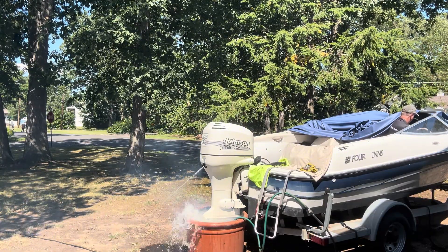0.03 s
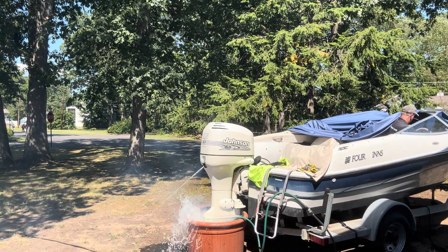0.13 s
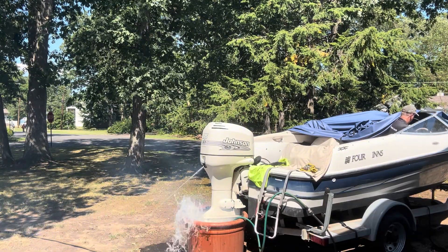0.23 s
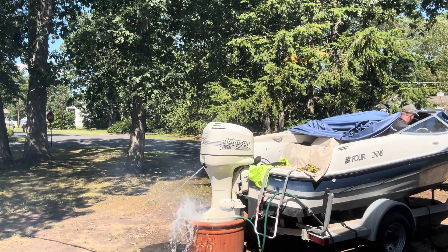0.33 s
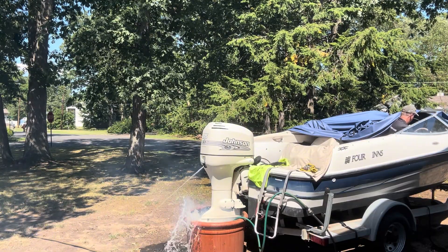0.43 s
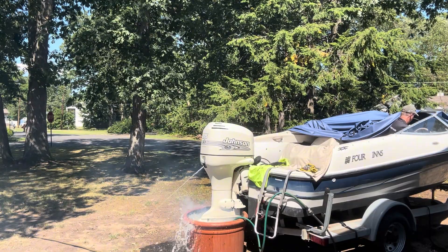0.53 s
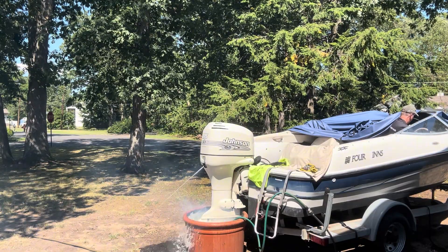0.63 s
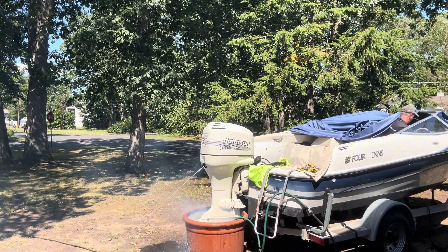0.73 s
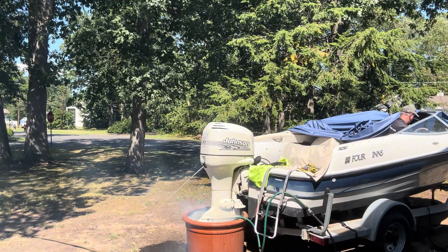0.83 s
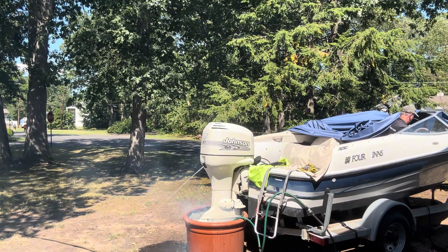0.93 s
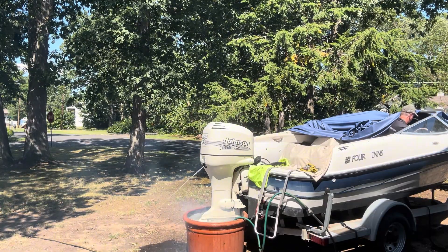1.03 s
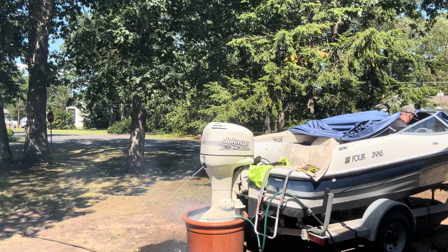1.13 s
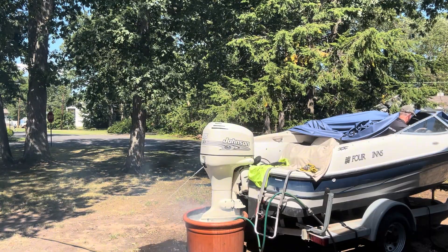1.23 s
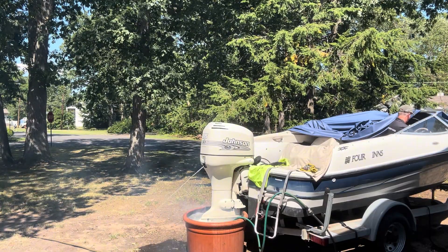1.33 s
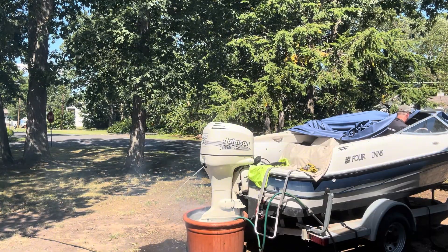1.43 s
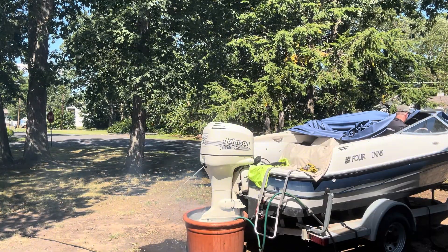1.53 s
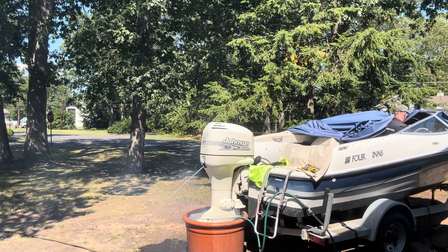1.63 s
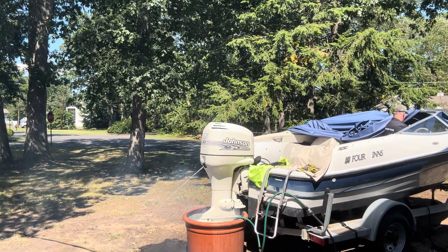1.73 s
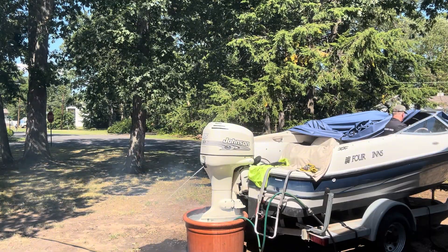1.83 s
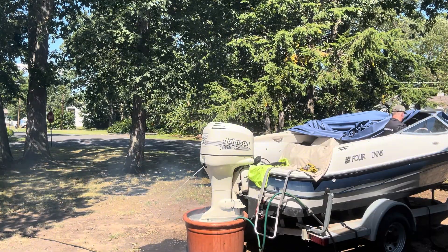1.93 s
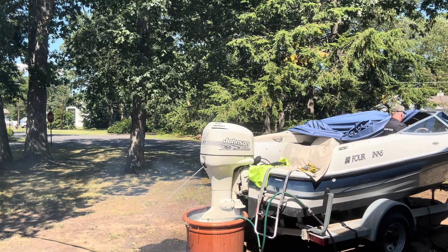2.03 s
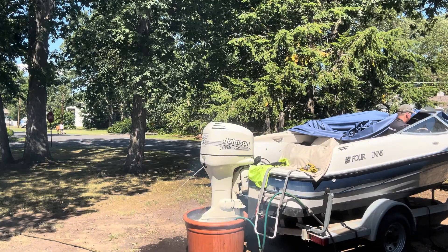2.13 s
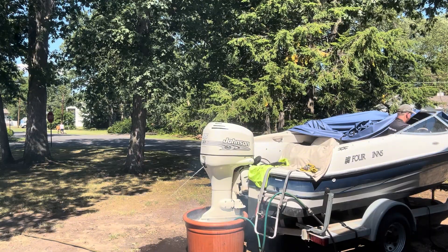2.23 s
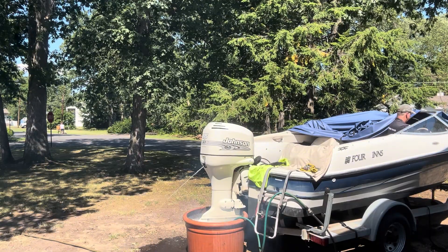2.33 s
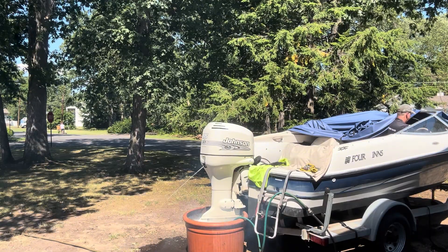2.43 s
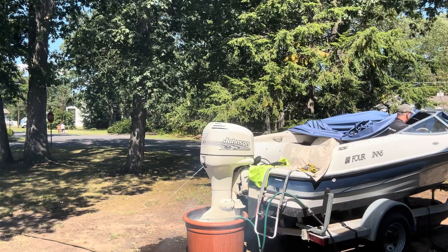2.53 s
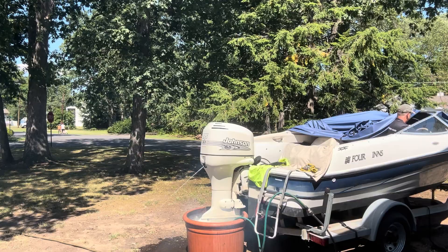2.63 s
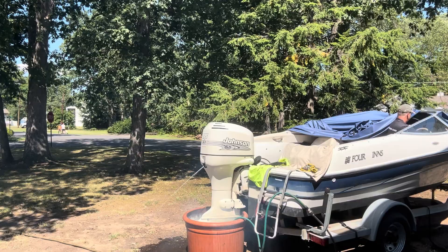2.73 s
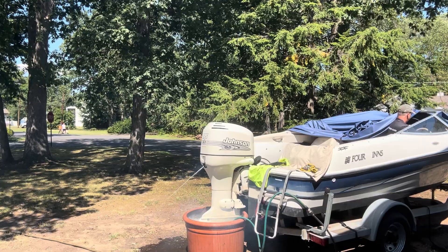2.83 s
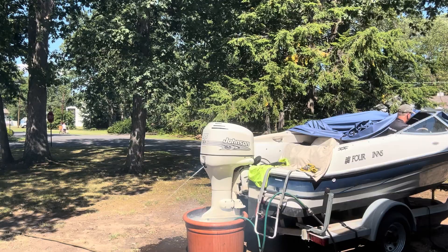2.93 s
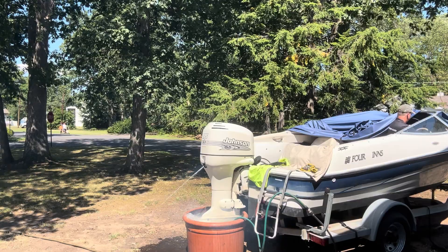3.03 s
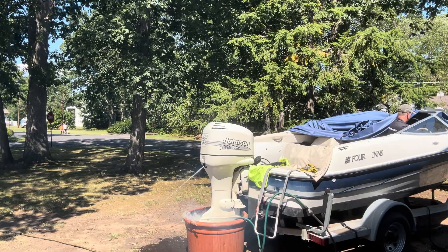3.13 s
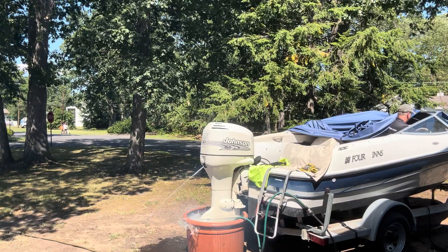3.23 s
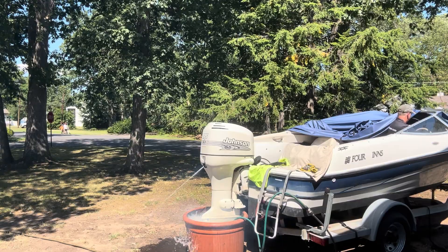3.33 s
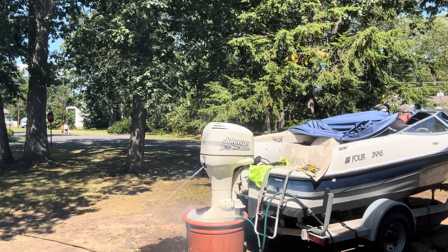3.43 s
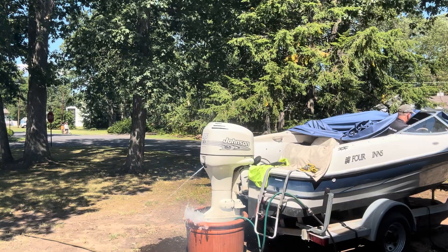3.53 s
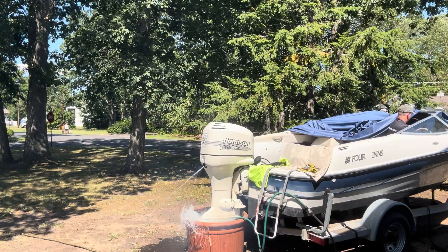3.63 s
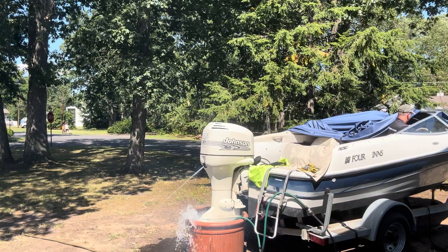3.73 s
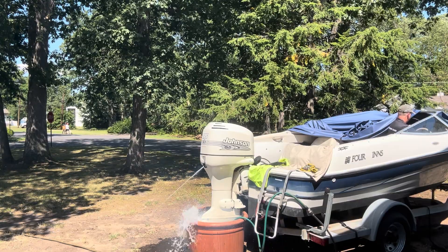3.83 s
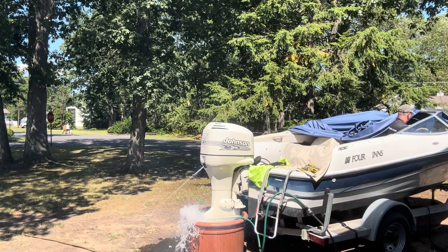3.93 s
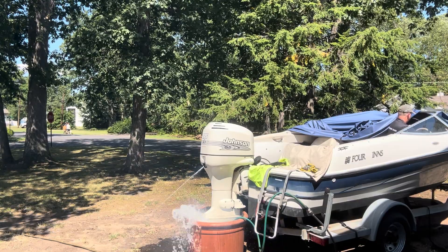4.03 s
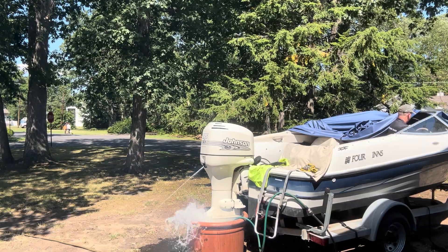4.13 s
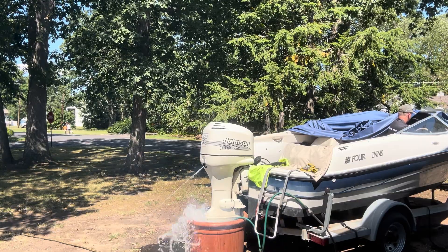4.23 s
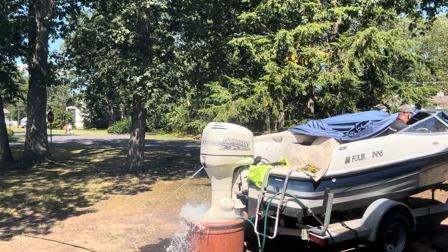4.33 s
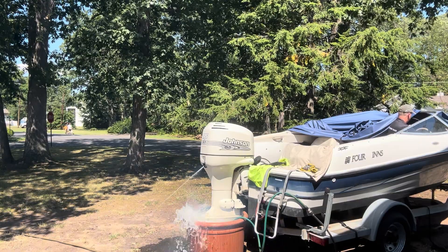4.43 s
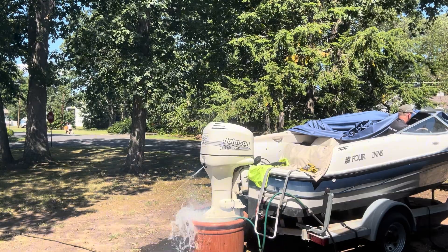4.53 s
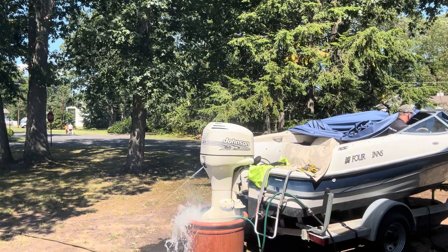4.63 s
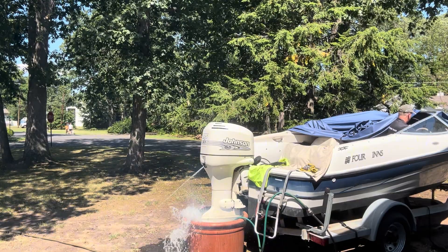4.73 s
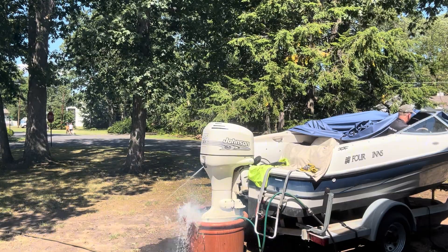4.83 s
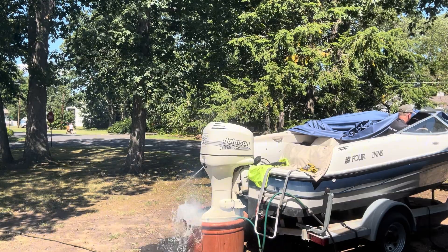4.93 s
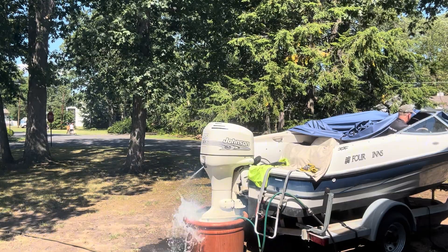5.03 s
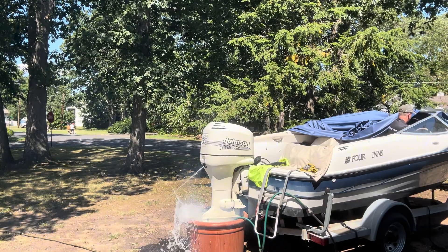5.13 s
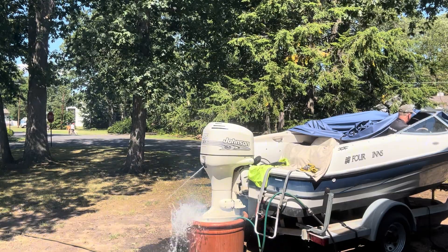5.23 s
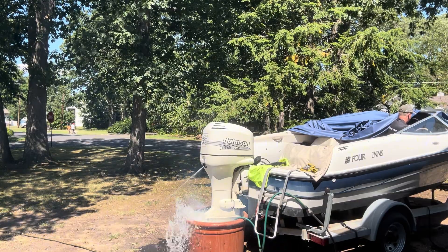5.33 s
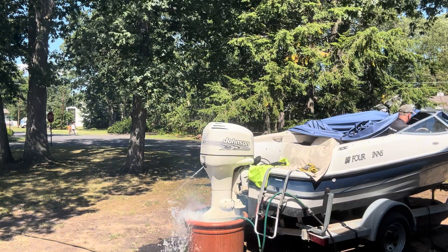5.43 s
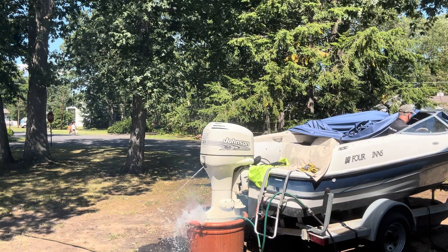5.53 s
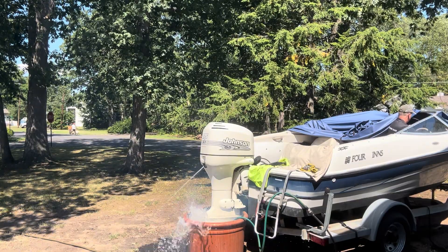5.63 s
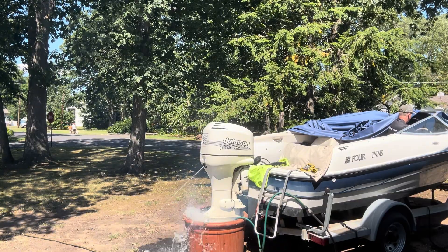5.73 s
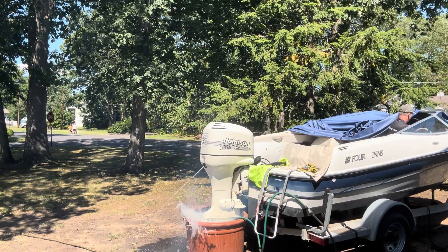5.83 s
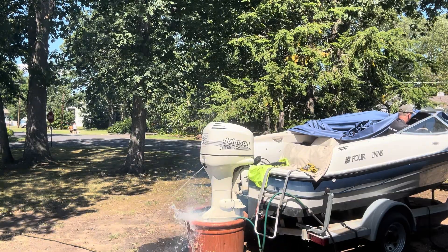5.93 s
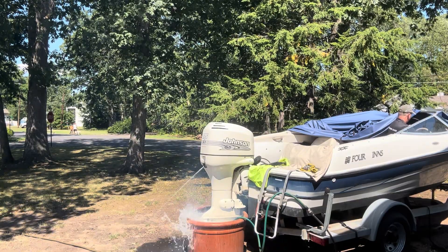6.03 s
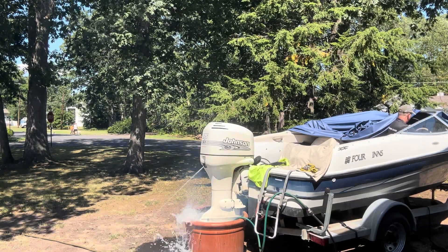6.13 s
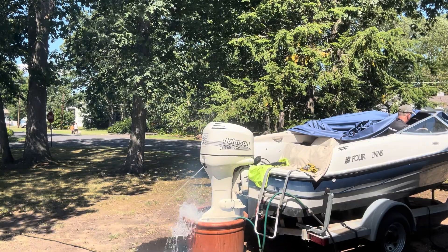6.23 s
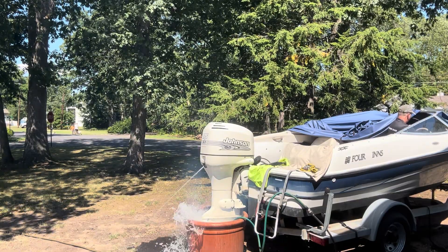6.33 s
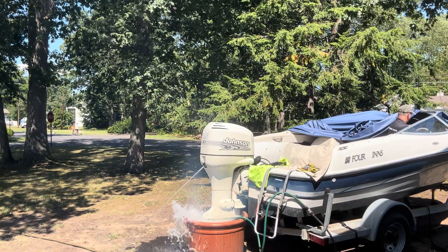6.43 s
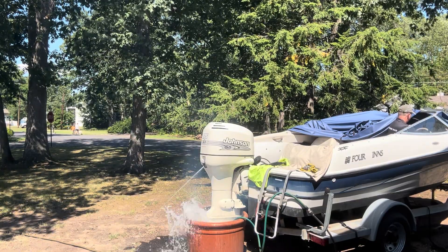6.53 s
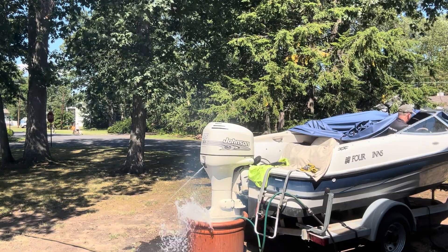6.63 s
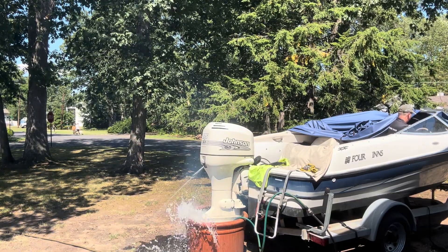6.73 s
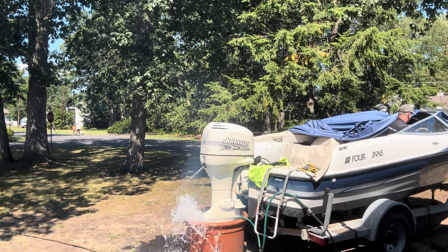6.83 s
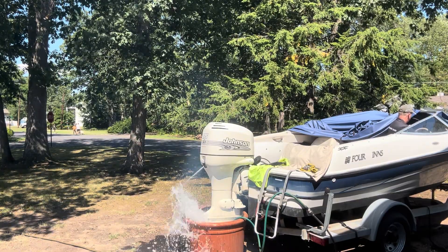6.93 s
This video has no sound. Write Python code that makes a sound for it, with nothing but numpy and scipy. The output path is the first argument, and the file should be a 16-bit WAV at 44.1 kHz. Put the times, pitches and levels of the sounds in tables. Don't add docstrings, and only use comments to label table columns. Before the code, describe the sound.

Rough two-stroke boat engine slows, idles softly, then burbles harder with a jingling metal fitting and splashing water, ending in a rising rev outdoors.

```python
import sys
import numpy as np
from scipy import signal
from scipy.io import wavfile
from scipy.ndimage import uniform_filter1d

SR = 44100
rng = np.random.default_rng(int(sys.argv[2]) if len(sys.argv) > 2 else 0)


def log_audio(samples):
    frames = np.atleast_2d(samples).T
    limited = np.clip(frames, -1, 1)
    pcm = np.round(limited * 32767).astype(np.int16)
    wavfile.write(sys.argv[1], SR, pcm)


def attenuation_scalar(level_db):
    decades = np.asarray(level_db, float) / 20
    return 10 ** decades


N = 307377
LOW_CUT_HZ = 24


def evened(x):
    return x / np.sqrt(np.mean(x ** 2) + 1e-20)


def curves(rows):
    s, *columns = np.transpose(rows)
    return [np.interp(np.arange(N) / SR, s, c) for c in columns]


def add(mix, s, sound):
    part = mix[round(s * SR):][:len(sound)]
    part += sound[:len(part)]


def steady(x, span_s):
    size = round(span_s * SR)
    power = uniform_filter1d(uniform_filter1d(x ** 2, size), size)
    return x / np.sqrt(abs(power) + 1e-20)


def resonate(x, hz, width):
    return signal.lfilter(*signal.iirpeak(hz, hz / width, SR), x)


def band(x, lo_hz, hi_hz):
    return signal.sosfilt(signal.butter(2, [lo_hz, min(hi_hz, SR / 2.1)], "bandpass", fs=SR, output="sos"), x)


def noise(points, patchy_db):
    frames, hz = N // 256 + 5, np.fft.rfftfreq(1024, 1 / SR)
    a, b, patches = rng.standard_normal((frames, 513, 3)).T
    patches = evened(uniform_filter1d(uniform_filter1d(patches, size=10, axis=0), size=10, axis=1))
    f, level_db = np.transpose(points)
    colour_db = np.interp(np.log(hz + 1), np.log(f + 1), level_db)[:, None]
    spectra = (a + 1j * b) * attenuation_scalar(colour_db + patchy_db * patches)
    return evened(signal.istft(spectra, nperseg=1024, noverlap=768)[1][:N])


def rattle(modes, phases):
    t = np.arange(SR // 6) / SR
    return sum(attenuation_scalar(db - 60 * t / t60) * np.sin(2 * np.pi * hz * t + a) for (hz, db, t60), a in zip(modes, phases))


def follow(part):
    # (time [s], effort [dB])
    effort = [(0.0, -46.5), (0.21, -48.5), (0.31, -52), (0.74, -54.5), (0.97, -57), (2.3, -58), (2.62, -60),
              (2.95, -55), (3.57, -51.5), (4.3, -51.5), (4.5, -51), (5.05, -50.5), (5.43, -51), (6.25, -51),
              (6.46, -48.5), (6.74, -43.5), (6.89, -42), (6.97, -49)]
    # (level at idle [dB], gain per dB of effort [dB])
    answers = [
        (4, 0.33),
        (-48, 0.87),
        (-54, 1.236),
        (-59, 1.1573),
        (-70.5, 0.8042),
        (-82.5, 1),
        (-94.5, 1.5),
    ]
    idle_db, share = answers[part]
    return idle_db + share * (curves(effort)[0] + 59)


def firings(turns):
    cylinder_db = [-5, -11, -4.5, -7.5, -4.5, -5]
    wander = evened(band(rng.standard_normal(N), 8, 120))
    steps = np.maximum.accumulate(6 * turns + .16 * wander + 1)
    count = steps.astype(int)
    luck = rng.standard_normal(1500)
    strength = attenuation_scalar(np.take(cylinder_db, count % 6) + 2.8 * luck[count])
    push = evened(np.diff(count, prepend=count[0]) * strength)
    fading = 0.96 + np.exp(-(steps % 1) / 0.73)
    puff = evened(strength * fading * rng.standard_normal(N))
    return push + .9 * puff


def motor_body(turns):
    # (pitch [Hz], width [Hz], level [dB])
    barrel = [(40, 12, -13), (68, 20, -11), (103, 15, 0)]
    # (pitch [Hz], width [Hz], level [dB])
    leg = [(152, 20, -3), (179, 16, .5), (205, 18, -2)]
    # (pitch [Hz], width [Hz], level [dB])
    cowl = [(280.4, 20.3, 0.5), (312.3, 22, -4), (358, 17.8, -4.5)]
    # (pitch [Hz], width [Hz], level [dB])
    intake = [(480, 125, 10.5), (561, 13.7, 14), (757.5, 97, 6.5), (849, 95, -2), (1021, 27.4, 10.5),
              (1209, 27.5, 8), (459, 3.8, 0)]
    # (time [s], level [dB])
    heave = [(0.0, -46), (2.1, -49.5), (2.25, -43), (2.48, -50), (2.95, -47.5), (3.4, -53.5), (3.82, -49.5),
             (4.25, -53), (4.68, -47), (4.97, -47), (5.39, -48), (5.86, -51), (6.89, -46.5), (6.97, -47)]
    drive, out = band(firings(turns), LOW_CUT_HZ, 900), np.zeros(N)
    for part, modes in enumerate((barrel, leg, cowl, intake)):
        ring = sum(attenuation_scalar(db) * resonate(resonate(drive, hz, 3 * w), hz, w) for hz, w, db in modes)
        level_db = follow(part)
        if part == 0:
            level_db = level_db + curves(heave)[0]
        out += attenuation_scalar(level_db) * steady(ring, .1)
    return out


def crank_shake(speed, turns):
    mount_hz, mount_width_hz, mount_db, shake_power = 41, 3.4, -40.5, .7
    nearness = 1 / np.hypot(1, (speed - mount_hz) / mount_width_hz)
    shake = attenuation_scalar(mount_db) * (speed / mount_hz) ** shake_power * nearness
    return np.sqrt(2) * shake * np.sin(2 * np.pi * turns)


def opening_swing():
    t = np.arange(N) / SR
    return -attenuation_scalar(-26.5 - 60 * t / 0.089) * np.cos(2 * np.pi * 190 * t)


def clatter(turns):
    # (pitch [Hz], level per Hz [dB])
    clatter_colour = [(800, -30), (1300, -1), (1600, -4), (1950, -7.5), (2280, -2), (2620, -8), (3200, -15),
                      (4100, -20), (4650, -19), (5600, -26), (7500, -33), (10500, -45), (16000, -60)]
    luck = np.minimum(rng.standard_normal(400), 1)
    beat = np.exp(-(turns % 1) / 0.44) * attenuation_scalar(8.7 * luck[turns.astype(int)])
    rough = steady(noise(clatter_colour, patchy_db=1.25), 0.17)
    return attenuation_scalar(follow(part=4)) * rough * (1 + 0.44 * uniform_filter1d(beat, size=200))


def spray():
    # (pitch [Hz], level per Hz [dB])
    spray_colour = [(2350, -31), (4000, -1), (4830, -1), (6680, -10), (8930, -12), (10900, -16),
                    (15000, -16), (15600, -18)]
    sizes = attenuation_scalar(3.5 * np.minimum(rng.exponential(1, N), 5))
    falls = rng.random(N) < 1500 / SR
    drops = sizes * falls * rng.choice([-1, 1], N)
    fizz = noise(spray_colour, patchy_db=.7) + 0.11 * evened(band(drops, 3200, 12000))
    return attenuation_scalar(np.minimum(follow(part=5), -72.5)) * fizz


def gears():
    hz, width_hz = 2250, 280
    rub = resonate(resonate(rng.standard_normal(N), hz, width_hz), hz, width_hz)
    return attenuation_scalar(follow(part=6)) * steady(rub, 0.17)


def still_air():
    # (pitch [Hz], level per Hz [dB])
    air_colour = [(3500, -30), (6500, -2), (9000, -3), (12000, -4), (15000, -4), (15600, -10)]
    return attenuation_scalar(-83 + .3) * noise(air_colour, patchy_db=1.5)


def bursts():
    # (time [s], peak level [dB], pitch [Hz])
    burps = [(0.045, -30, 180), (3.32, -29, 164), (3.376, -29, 175.6), (3.432, -30, 177.6),
             (3.563, -30.5, 167.7), (3.654, -35, 159), (3.719, -36.5, 167), (3.76, -37, 155),
             (3.861, -40, 168), (3.921, -30.5, 162.5), (4.083, -25.5, 181), (4.289, -25, 188),
             (4.543, -34, 197), (4.624, -24.5, 186), (4.811, -29.5, 191.4), (4.898, -31.5, 188),
             (4.939, -25, 185), (5.095, -25.5, 199.4), (5.207, -39, 178), (5.291, -33, 159),
             (5.371, -39, 182.5), (5.433, -27.5, 184), (5.598, -28.5, 182.5), (5.998, -26, 186),
             (6.158, -31.5, 194), (6.301, -35.5, 210.4), (6.34, -27, 174), (6.388, -25, 199.6),
             (6.487, -26, 171.5), (6.543, -30, 258.6), (6.644, -23.5, 205), (6.69, -23, 179),
             (6.848, -23.5, 168.5)]
    # (time [s], peak level [dB], pitch [Hz])
    lumps = [(0.627, -34, 208), (1.24, -40, 213), (1.542, -37.5, 205), (1.667, -36, 213),
             (1.771, -41, 204.5), (1.975, -41, 205), (2.069, -36.5, 191), (2.149, -57, 170),
             (2.221, -33, 206), (2.351, -33.5, 195), (2.499, -36, 187), (2.627, -37, 184),
             (2.734, -35.5, 184.6), (2.821, -38.5, 256), (2.874, -48, 260), (2.99, -34, 207),
             (3.239, -42, 207)]
    # (time [s], peak level [dB], pitch [Hz])
    pockets = [(3.487, -29.5, 172.4), (3.529, -37, 196), (3.971, -28.5, 174), (4.038, -33.5, 202),
               (4.228, -29.5, 178), (4.339, -26.5, 186), (4.482, -43, 157), (4.668, -32.5, 177),
               (4.849, -28, 180), (5.029, -40, 196), (5.138, -25, 190.6), (5.522, -34, 189),
               (5.657, -27, 192), (5.768, -23.5, 186.5), (5.827, -39, 214), (5.899, -30, 171),
               (6.061, -41, 157), (6.239, -34.5, 182)]
    # (time [s], peak level [dB], pitch [Hz], length [s])
    booms = [(0.093, -39, 124, 0.033), (0.005, -33, 93, 0.011), (0.235, -39, 102, 0.037),
             (0.365, -32, 98, 0.018), (4.585, -35, 104, 0.037), (5.25, -51, 104, 0.024),
             (5.47, -35, 97, 0.016), (5.86, -39, 96, 0.026), (6.23, -34.5, 96, 0.028),
             (6.5, -33, 105, 0.087), (6.57, -33, 103, 0.046), (6.91, -49, 100.5, 0.053),
             (0.441, -37, 106, 0.022), (1.004, -32, 110, 0.02), (1.429, -35.5, 111, 0.018),
             (1.583, -40, 95, 0.013), (1.835, -38.5, 108, 0.034), (2.909, -40.5, 123.4, 0.048),
             (3.385, -31.5, 108, 0.008), (4.342, -37, 128, 0.011), (4.821, -40, 99, 0.015),
             (5.105, -33, 101.3, 0.041), (6.454, -28, 110, 0.012), (6.81, -41, 112, 0.021),
             (6.883, -28.5, 121, 0.015)]
    # (time [s], peak level [dB], pitch [Hz], length [s])
    kicks = [ (3.605, -30.5, 178, 0.022), (3.8, -35.5, 181.5, 0.055), (4.0, -37.5, 181.5, 0.047),
             (4.99, -28.5, 197, 0.024), (6.86, -39.5, 613, 0.034), (0.065, -27.5, 235, 0.013),
             (0.175, -27.5, 185, 0.01), (5.72, -35.5, 201.4, 0.12), (2.23, -42, 207, 0.017),
             (0.042, -36, 444, 0.011), (1.983, -45, 372, 0.026), (2.04, -45, 369, 0.022),
             (4.638, -40, 566, 0.018), (4.969, -40.5, 568, 0.023), (5.093, -44.5, 376, 0.036),
             (5.423, -41, 370, 0.013), (6.012, -42, 372, 0.016), (6.335, -42, 364, 0.013),
             (6.446, -36.5, 565, 0.0064), (6.508, -38, 384, 0.0081), (6.663, -32.5, 393, 0.024),
             (6.749, -39, 581, 0.02), (6.826, -35, 562, 0.025)]
    rows = [(s, db, hz, 0.034 - .0012 * (db + 37.0)) for s, db, hz in burps]
    rows += [(s, db - 4.0, hz, .022) for s, db, hz in list(lumps) + list(pockets)]
    rows += list(booms) + list(kicks)
    out = np.zeros(N)
    for (s, db, hz, length), start in zip(rows, rng.random(len(rows))):
        t = np.arange(round(5 * length * SR)) / SR
        u = t / max(length, .006) * 1.49
        shape = (u * np.exp(1 - u)) ** 1.4
        slap = attenuation_scalar(-25) * evened(band(rng.standard_normal(len(t)), 330, 780))
        tone = np.sin(2 * np.pi * (hz * t + start))
        add(out, max(s - .007, 0), attenuation_scalar(db + 1.06) * shape * (tone + slap))
    return out


def puffs():
    # (time [s], peak level [dB], centre pitch [Hz])
    puff_rows = [(0.038, -39, 462), (0.107, -37, 520), (0.184, -32, 552), (0.255, -41, 594),
                 (1.348, -49, 600), (2.085, -42.5, 648), (2.355, -48, 516), (2.812, -47, 510),
                 (3.386, -49, 560), (3.436, -42, 570), (3.471, -41, 630), (3.541, -46, 577),
                 (3.592, -42, 550), (3.84, -44, 580), (3.893, -42, 570), (3.949, -37, 566),
                 (3.991, -43, 562), (4.04, -37.5, 567), (4.135, -44, 574), (4.174, -47, 576),
                 (4.245, -34.5, 565), (4.301, -37, 540), (4.345, -40, 527), (4.482, -40.5, 580),
                 (4.585, -41.5, 584), (4.64, -39, 550), (4.784, -40.5, 580), (4.907, -44, 545),
                 (4.956, -41.5, 580), (5.093, -37.5, 455), (5.161, -38.5, 530), (5.284, -50, 580),
                 (5.424, -37.5, 580), (5.466, -40.5, 541), (5.601, -52, 544), (5.76, -43, 554),
                 (5.805, -39, 560), (5.886, -44, 517), (6.014, -41, 570), (6.05, -46, 575),
                 (6.105, -37, 577), (6.289, -46, 546), (6.357, -44, 560), (6.387, -44, 544),
                 (6.446, -36.5, 575), (6.539, -39, 594), (6.667, -32.5, 584), (6.735, -40, 604),
                 (6.826, -39, 560)]
    out, t = np.zeros(N), np.arange(SR // 12) / SR
    shape = (t / 0.012 * np.exp(1 - t / .011)) ** 0.93
    for (s, db, hz), grain in zip(puff_rows, rng.standard_normal((len(puff_rows), len(t)))):
        pitched = evened(resonate(resonate(grain, hz, 110), hz, 110))
        colour = pitched + .75 * evened(band(grain, 330, 1300))
        add(out, max(s - .004, 0), attenuation_scalar(db - 10.0) * shape * colour)
    return band(out, 200, 1700)


def snaps():
    # (time [s], 4-11 kHz peak level [dB],
    # 0.5-1.4 kHz level [dB], 1.4-4 kHz level [dB], 11-15 kHz level [dB])
    snap_rows = [(0.0727, -63, -2, -3, -5), (0.217, -62.5, 22.5, 14.5, 5), (0.574, -61.5, 19, 18.5, -10),
                 (0.7596, -65, -12, 20, 0), (1.6023, -77.5, 3, 19, -19), (2.082, -75.5, 29.5, -3, -23),
                 (2.094, -76.5, 27, 14, -23), (2.102, -81, 35, 6, -23), (2.126, -82, 27, 9, -23),
                 (2.275, -68, -6, -26, 5), (2.297, -78, -6, -6, 8), (3.1633, -74, 7, 8, -23),
                 (6.896, -62.5, 26.5, 18, 5)]
    out, t = np.zeros(N), np.arange(SR // 6) / SR
    after = np.maximum(t - .002, 0)
    shape = np.minimum(t / .001, 1) * (attenuation_scalar(-60 * after / .02) + attenuation_scalar(-16 - 60 * t / .055))
    thump = rattle([(382, -12, .16), (315, -14, .16)], (0, 0)) * np.minimum(t / .008, 1)
    for s, db, body_db, low_db, top_db in snap_rows:
        grain, fine = rng.standard_normal((2, len(t)))
        body = evened(band(grain, 530, 1920))
        low = evened(band(grain, 1460, 5070) + 2.5 * resonate(grain, 2400, 180))
        high = evened(band(grain, 3800, 8500) + .8 * resonate(grain, 8660, 300))
        top = evened(band(fine, 10300, 19000))
        colour = attenuation_scalar(body_db) * body + attenuation_scalar(low_db) * low + high + attenuation_scalar(top_db) * top
        add(out, s, attenuation_scalar(db) * (attenuation_scalar(-5) * colour * shape + thump))
    add(out, 2.06, attenuation_scalar(-35) * np.hanning(2200))
    return out


def ticks():
    # (time [s], peak level [dB], 1.4-4 kHz level against it [dB])
    tick_rows = [
        (0.1491, -64, 7),
        (0.7014, -69, 8),
        (0.7194, -64, -2),
        (0.7357, -62, 0),
        (1.8761, -68, 0),
        (2.0143, -67, 5),
        (2.6784, -72, 8),
        (2.076, -68, -8),
        (1.43, -68, 6),
        (3.17, -66, 0),
    ]
    out, t = np.zeros(N), np.arange(SR // 30) / SR
    for (s, db, low_db), (a, b) in zip(tick_rows, rng.standard_normal((len(tick_rows), 2, len(t)))):
        colour = evened(band(a, 5000, 15500)) + attenuation_scalar(low_db - 16) * evened(band(b, 1400, 3300))
        add(out, s, attenuation_scalar(db - 6 - 60 * t / .014) * colour)
    return out


def fitting():
    # (time [s], first tone level [dB],
    # second tone level [dB], third pair level [dB], upper tones level [dB])
    jingles = [(3.694, -58, -15, -17, -22), (3.7654, -59.5, -8, -11, -12), (3.802, -57, -27, -19, -20),
               (3.8357, -53, -20, -10, -17), (3.902, -60, -12, -19, -20), (3.938, -48.5, -15, -15, -15),
               (3.9705, -55, -18, -13, -21), (4.006, -55, -16, -9, -15), (4.046, -49, -22, -18, -20),
               (4.1121, -60, -12, -12, -14), (4.1426, -59.5, -4.5, -16, -12), (4.1704, -59, -17, -10, -19),
               (4.2374, -57, -10, -11, -13), (4.269, -66, -11, -6, -14), (4.3036, -57.5, -15, -12, -17),
               (4.34, -56, -20, -12, -15), (4.4039, -57, -10, -11, -14), (4.4368, -53.5, -9, -11, -11),
               (4.501, -63, -12, -13, -12), (4.5378, -46, -12.5, -11.5, -16), (4.636, -52.5, -20, -22, -20)]
    # (time [s], first [dB], second [dB], third pair [dB], upper [dB])
    late_jingles = [(5.608, -66, -8, -7, -13), (5.6436, -67, -11, -11, -17), (5.708, -55.5, -16, -22, -22),
                    (5.7446, -54.5, -11, -14, -19), (5.772, -63, -5, -8, -12),
                    (5.8085, -55.5, -8, -11, -15), (5.8426, -49, -18, -18, -19),
                    (5.8724, -56.5, -11, -10, -16), (5.91, -54.5, -7, -10, -11),
                    (5.938, -56, -13, -17.5, -13), (5.973, -56, -13, -15, -17),
                    (6.0084, -48, -13, -15, -16), (6.0711, -62, -8, -14, -15), (6.1072, -49, -14, -19, -15),
                    (6.202, -56, -11, -15, -15)]
    # (pitch [Hz], level [dB], time to fall 60 dB [s])
    upper_tones = [(10080, -11, .08), (10950, -10, .07), (11640, -13, .08), (12139, -5, .1),
                   (12920, -10, .08), (13631, -7, .07), (14700, -17, .06), (15380, -9, .07)]
    out, t = np.zeros(N), np.arange(SR // 6) / SR
    rise = 1 - np.exp(-(t / .0045) ** 2)
    taps = list(jingles) + list(late_jingles) + [(.468, -60, -17, -17, -24)]
    for (s, db, second_db, third_db, upper_db), luck in zip(taps, rng.standard_normal((len(taps), 18, 2))):
        bend = 1 + .001 * luck[-1, 0]
        lean_db = 3 * luck[-2, 0]
        modes = [(3327, -5.5, 0.08), (3380, -13.0, 0.08), (3095, -20, .06),
                 (6065, second_db - 3, 0.15),
                 (9050, third_db - 8.5 + lean_db, 0.1), (8963, third_db - 11, 0.08),
                 (9170, third_db - 13, .06), (9518, third_db - 7.5 - lean_db, 0.14)]
        modes += [(f, g + upper_db - 3.2 + 4.2 * min(a, 1), d) for (f, g, d), a in zip(upper_tones, luck[:, 0])]
        chatter = 1 + .22 * evened(band(rng.standard_normal(len(t)), 30, 160))
        tick = attenuation_scalar(upper_db - 9 - 60 * t / 0.05) * evened(band(rng.standard_normal(len(t)), 4000, 16000))
        ring = rattle([(f * bend, g, d) for f, g, d in modes], np.pi * luck[:, 1])
        add(out, s - .003, attenuation_scalar(db + 9.0) * (ring * chatter + tick) * rise)
    return out


def crack():
    # (time [s], level [dB])
    crack_slips = [
        (.6034, -9),
        (.6044, -3),
        (.6051, 0),
        (.6059, 0),
        (.6068, -5),
        (.6078, -6),
        (.609, -10),
    ]
    # (pitch [Hz], width [Hz], level [dB])
    crack_rings = [(600, 300, -4), (930, 200, -3), (1750, 500, -9), (2600, 230, 2), (3280, 300, -4),
                   (4160, 200, -8), (4900, 500, -8), (6250, 500, -6), (7570, 300, -6), (8660, 240, -3),
                   (11080, 500, -6), (12500, 600, -7), (13930, 300, -7), (15300, 700, -9)]
    # (time [s], peak level [dB], pitch [Hz], time to fall 60 dB [s])
    pings = [
        (6.8975, -53, 5750, .02),
        (6.898, -62, 7800, .04),
        (6.897, -56, 14100, .015),
        (6.897, -57, 15100, .015),
        (2.084, -52, 1750, .03),
        (2.103, -53, 1800, .04),
        (.5745, -54, 4300, .015),
    ]
    out, t = np.zeros(N), np.arange(SR // 8) / SR
    start = crack_slips[0][0]
    grain, fine = rng.standard_normal((2, len(t)))
    slips = sum(attenuation_scalar(db - 60 * np.maximum(t - s + start, 0) / 0.0073) * (t >= s - start) for s, db in crack_slips)
    rustle = attenuation_scalar(-14 - 60 * t / .065) * evened(band(fine, 460, 3800) + 0.11 * fine)
    drive = slips * grain + rustle
    ring = sum(attenuation_scalar(db) * resonate(drive, hz, w) * np.sqrt(3000 / w) for hz, w, db in crack_rings)
    thump = rattle([(375.5, -31.5, 0.14), (312, -33, 0.21)], (0, 0))[:len(t)] * np.minimum(t / .008, 1)
    add(out, start, attenuation_scalar(-28.5) * (ring + .5 * drive) + thump)
    for s, db, hz, t60 in pings:
        add(out, s, rattle([(hz, db, t60)], (0,))[:len(t)] * np.minimum(t / 0.00089, 1))
    return out


def knocks():
    # (time [s], peak level [dB])
    knock_rows = [
        (0.8036, -56),
        (0.8744, -55),
        (0.9477, -54),
        (1.0236, -54),
        (1.1044, -55),
        (1.1792, -58),
        (1.2635, -57),
        (1.4394, -60),
        (2.0194, -61),
    ]
    # (pitch [Hz], level [dB], time to fall 60 dB [s])
    block = [(2300, 0, .09), (3100, -3, .07), (3900, -9, .07), (5450, -9, .05), (7600, -16, .04)]
    out, t = np.zeros(N), np.arange(SR // 10) / SR
    for (s, db), luck in zip(knock_rows, rng.standard_normal((len(knock_rows), 5))):
        ring = sum(attenuation_scalar(g + 2 * a - 60 * t / d) * evened(resonate(rng.standard_normal(len(t)), f, 190))
                   for (f, g, d), a in zip(block, luck))
        add(out, s, attenuation_scalar(db - 7) * ring * np.minimum(t / .006, 1))
    return out


def pump_whine():
    # (time [s], pitch [Hz], level [dB])
    whine_rows = [
        (2.18, 4600, -105),
        (2.25, 4600, -84),
        (2.6, 4550, -86),
        (2.7, 4650, -97),
        (2.85, 4720, -83),
        (3.12, 4780, -83),
        (3.2, 4780, -105),
    ]
    hz, whine_db = curves(whine_rows)
    fuzz = evened(band(rng.standard_normal(N), 4, 50))
    spin = 2 * np.pi * np.cumsum(hz * (1 + .006 * fuzz)) / SR
    late = np.clip((hz - 4620) / 80, 0, 1)
    return attenuation_scalar(whine_db + 1.5) * (1 + 0.5 * fuzz) * (np.sin(spin) + .7 * late * np.sin(.84 * spin))


def firing_note(speed):
    # (time [s], peak level [dB])
    surges = [
        (6.49, -35),
        (6.555, -35),
        (6.65, -29),
        (6.676, -27),
        (6.703, -29),
        (6.761, -24.5),
        (6.772, -23.5),
        (6.783, -26.5),
        (6.845, -37),
        (6.875, -26.5),
    ]
    t = np.arange(N) / SR
    note_db = np.max([db - 420 * np.maximum(s - t, 2 * (t - s)) for s, db in surges], axis=0)
    flutter = evened(band(rng.standard_normal((2, N)), 11.0, 46))
    phase = 2 * np.pi * np.cumsum(6 * speed * (1 + .01 * flutter[0])) / SR
    note = np.sin(phase) + attenuation_scalar(-16.0) * np.sin(2 * phase)
    return np.sqrt(2) * attenuation_scalar(note_db + 2.5 * flutter[1]) * note


def yard(x):
    t = np.arange(SR // 4) / SR
    echoes = rng.random(len(t)) < .05
    tail = rng.standard_normal(len(t)) * echoes * attenuation_scalar(-60 * t / 0.14) * (t > .006)
    return x + attenuation_scalar(-30) * signal.fftconvolve(x, tail / np.linalg.norm(tail))[:N]


def scene():
    # (time [s], crank turns per second [Hz])
    crank = [(0.0, 38.1), (0.25, 37.2), (0.47, 29.0), (0.89, 13.8), (1.3, 12.3), (2.68, 13.1), (3.28, 24.8),
             (3.57, 27.7), (3.98, 28.8), (4.6, 29.3), (5.01, 30.8), (5.69, 28.9), (6.31, 29.3),
             (6.484, 35.7), (6.62, 45.8), (6.79, 52.4), (6.886, 51.9), (6.97, 49.5)]
    speed = curves(crank)[0]
    turns = np.cumsum(speed) / SR
    motor = motor_body(turns) + crank_shake(speed, turns) + opening_swing() + firing_note(speed)
    gas = bursts() + puffs()
    hiss = clatter(turns) + spray() + gears() + still_air() + pump_whine()
    small = snaps() + ticks() + fitting() + crack() + knocks()
    return (motor + gas + hiss + yard(small))[None]


def band_limit(x):
    return signal.sosfilt(signal.butter(12, 16440, fs=SR, output="sos"), x)


def record(dry):
    cut = signal.sosfilt(signal.butter(2, LOW_CUT_HZ, "highpass", fs=SR, output="sos"), dry)
    top_cut = signal.firwin(801, 15740, window=("kaiser", 7), fs=SR)
    mix = signal.oaconvolve(cut, top_cut[None], "same")
    return band_limit(mix)


dry = scene()
out = record(dry)
log_audio(out)
```